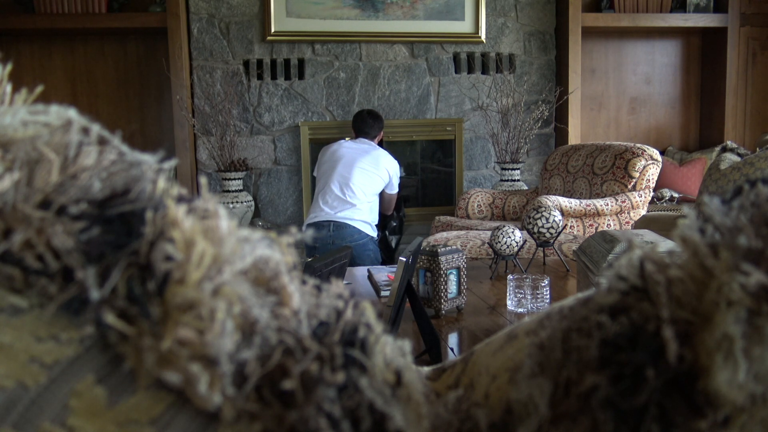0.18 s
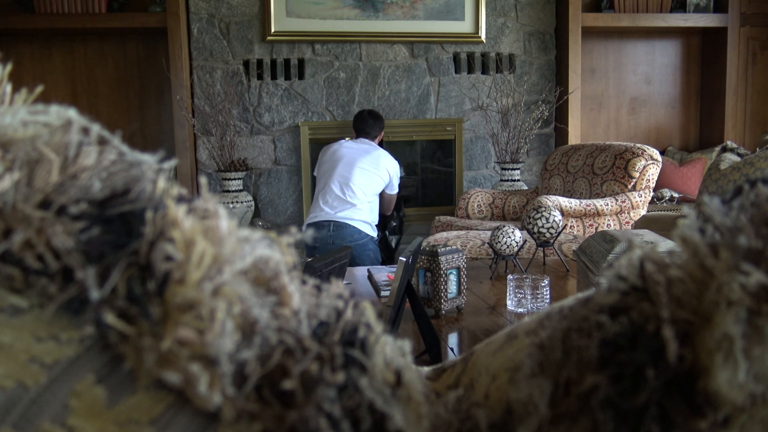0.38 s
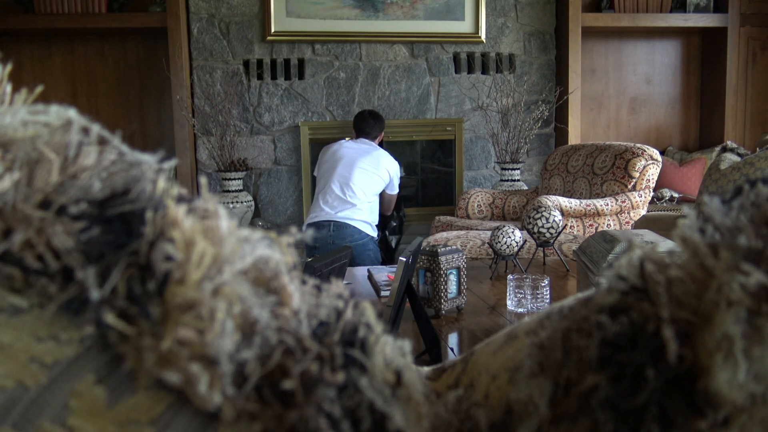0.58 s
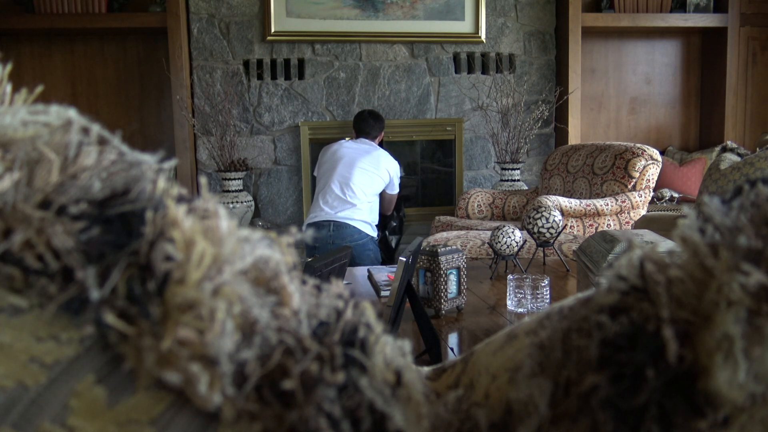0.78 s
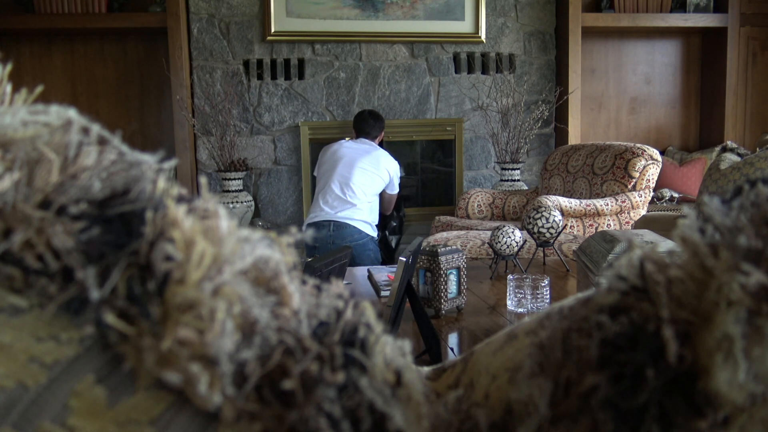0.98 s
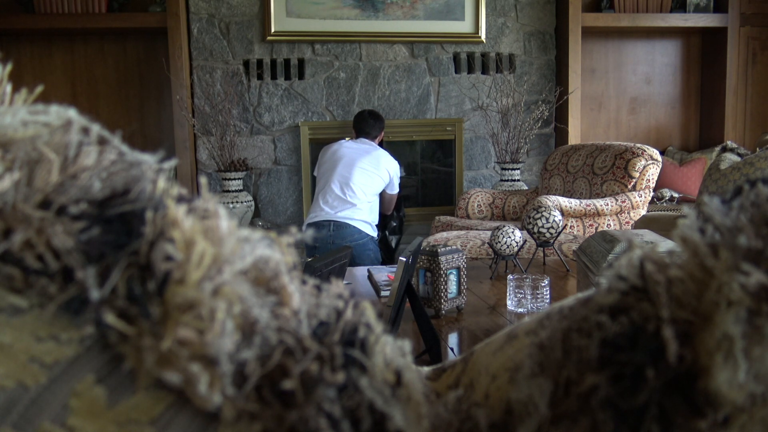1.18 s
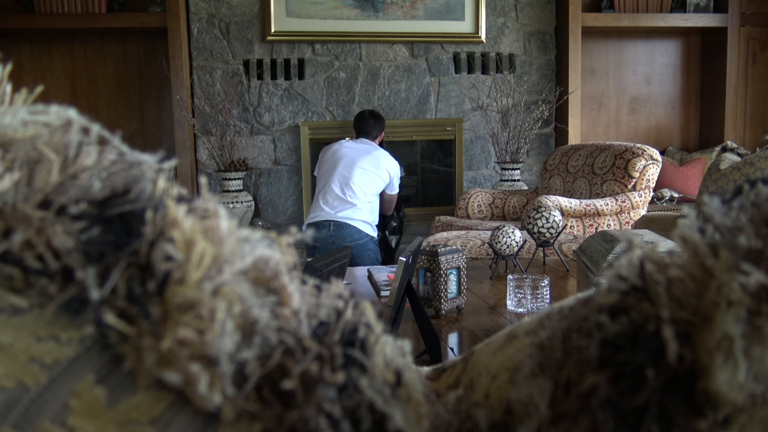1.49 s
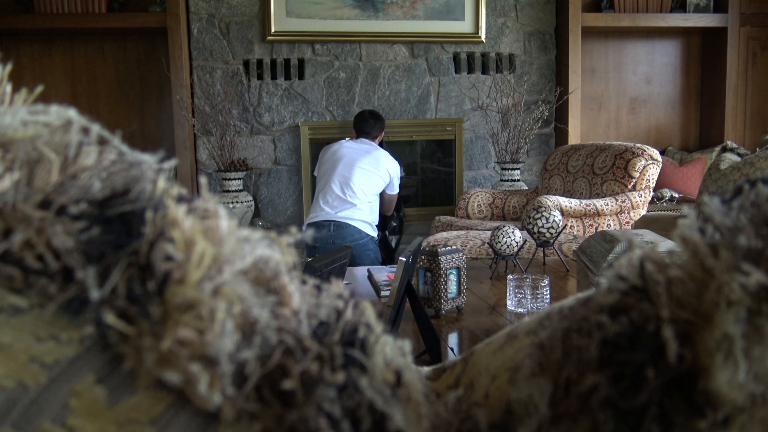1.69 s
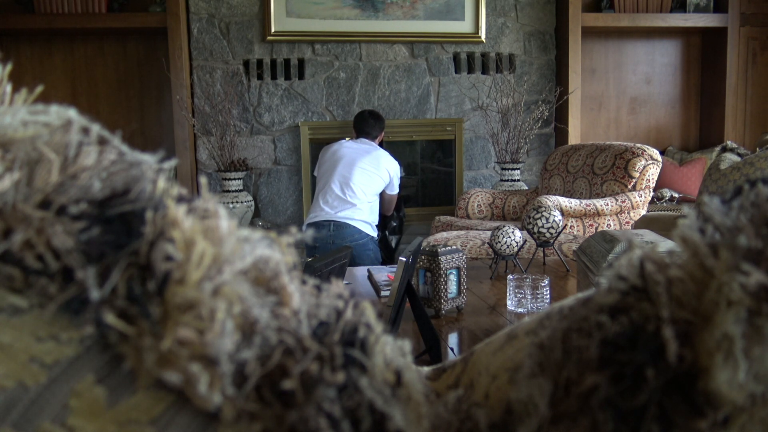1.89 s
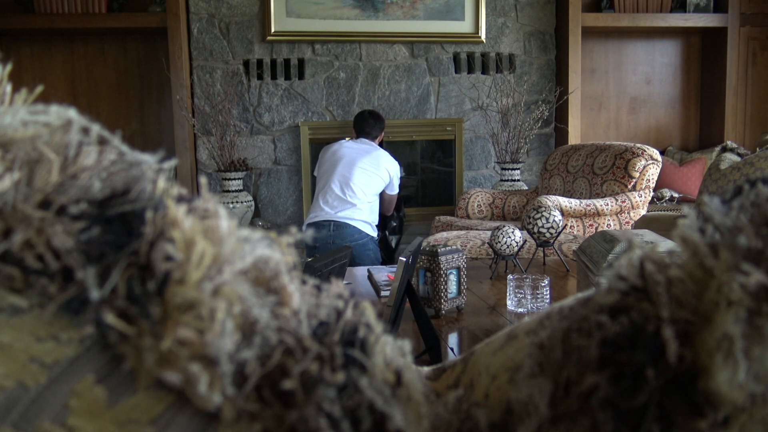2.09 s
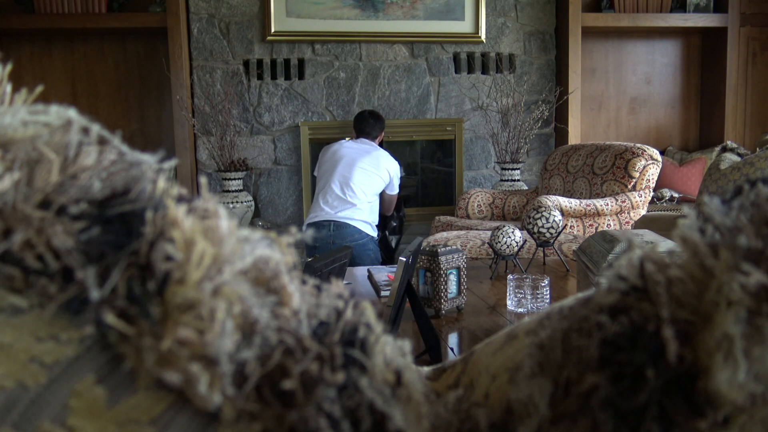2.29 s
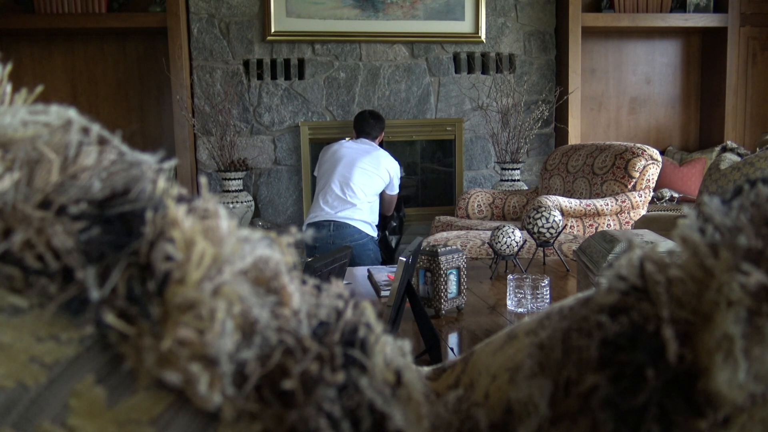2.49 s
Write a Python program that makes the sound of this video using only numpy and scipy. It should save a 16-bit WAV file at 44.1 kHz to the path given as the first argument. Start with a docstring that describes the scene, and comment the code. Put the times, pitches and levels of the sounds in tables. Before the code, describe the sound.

Six quick, even clanking shakes of steel and glass fireplace doors, loose panes chattering, then settling

```python
"""The metal-framed glass doors of a fireplace are shaken six times, heard from across a living room.
Each shake clashes the doors against the frame: noise cracks, echoes and decaying modes make the steel clack and ring.
Random ticks make loose panes chatter and low-pitched noise makes the firebox boom.
Damped sines and noise give dull knocks of the panels between the clashes and as the doors settle.
Noise tails let the room ring on over a faint hum of coloured noise."""
import sys
import numpy as np
from scipy import signal
from scipy.fft import rfft, irfft, next_fast_len
from scipy.io import wavfile

SR = 44100
rng = np.random.default_rng(int(sys.argv[2]) if len(sys.argv) > 2 else 0)


def dump_mix(stems):
    """Bounce the given channels to the path in sys.argv[1] as a 16-bit WAV at rate SR."""
    frames = np.atleast_2d(stems).T  # one column per channel
    limited = np.clip(frames, -1, 1)  # hard clip at full scale
    pcm = np.round(limited * 32767).astype(np.int16)
    wavfile.write(sys.argv[1], SR, pcm)


N = 114660
T = np.arange(round(.95 * SR)) / SR  # time axis of one event, s
TAIL_RISE_S = 0.0064  # time constant


def amp(db):
    """Decibel law: the amplitude gain of a level in dB."""
    return 10 ** (np.asarray(db) / 20)


def unit(x):
    """Normalisation: x scaled to rms 1."""
    return x / np.sqrt(np.mean(x ** 2) + 1e-20)


def along(points, hz):
    """Logarithmic interpolation: (frequency, value) points read on a log frequency axis."""
    f, v = np.transpose(points)
    return np.interp(np.log(hz + 1), np.log(f + 1), v)


def fade(t60_s):
    """Exponential decay: the level falls 60 dB in t60_s."""
    return np.exp(-np.log(1000) * T / t60_s)


def build_up(rise_s):
    """Exponential approach: a sound grows from zero with time constant rise_s."""
    return 1 - np.exp(-T / rise_s)


def noise():
    """White noise: equal power density at all frequencies, for the length of one event."""
    return rng.standard_normal(len(T))


def add(track, start_s, sound):
    """Superposition: mix a sound into the track at start_s."""
    i = round(start_s * SR)
    track[i:i + len(sound)] += sound[:N - i]


def coloured(x, gain):
    """Minimum-phase filtering: a causal filter of the given gain; white noise keeps its level."""
    m = 2 * next_fast_len(len(x) // 2 + 4096)
    magnitude = np.maximum(unit(gain(np.fft.rfftfreq(m, 1 / SR))), 1e-6)
    cepstrum = irfft(np.log(magnitude))
    # folding the cepstrum onto positive time makes the filter causal
    cepstrum[1:m // 2] *= 2
    cepstrum[m // 2 + 1:] = 0
    return irfft(rfft(x, m) * np.exp(rfft(cepstrum)))[:len(x)]


def shape(points, tilt_db=0):
    """Spectral envelope: the gain of a spectrum, tilted in dB per octave about 2500 Hz, down to 400 Hz."""
    def gain(hz):
        octaves = np.log2(np.maximum(hz, 400) / 2500)
        return amp(along(points, hz) + tilt_db * octaves)
    return gain


def resonances(table):
    """Resonance: the gain of several damped modes, their powers summed."""
    def gain(f):
        return np.sqrt(sum((amp(db) / (1 + ((f - hz) / width) ** 2)) ** 2 for hz, width, db in table))
    return gain


# reverberation of the living room: frequency [Hz], t60 [s]
ROOM_DECAY = [(60, 1.83), (150, 0.81), (280, 0.83), (550, 0.51), (900, 0.71), (1800, 0.7), (4800, .7),
              (9000, 0.62), (15000, 0.46)]


def tail():
    """Diffuse reverberation: noise that starts at rms 1, each frequency dying at its own rate."""
    hz, t, bands = signal.stft(noise(), SR, nperseg=256)
    decay = amp(-60 * t / along(ROOM_DECAY, hz)[:, None])
    return signal.istft(bands * decay, SR, nperseg=256)[1][:len(T)]


def in_room(x, wet_db):
    """Convolution: a sound plus its reverberation through a random room response of unit energy."""
    answer = tail() * build_up(TAIL_RISE_S)
    answer /= np.linalg.norm(answer)
    return x + amp(wet_db) * signal.fftconvolve(x, answer)[:len(x)]


def ticks(per_s, scatter_db):
    """Random impulse process: sparse contacts of either sign and uneven size, rms 1."""
    present = rng.random(len(T)) < per_s / SR
    sign = rng.choice([-1, 1], len(T))
    return unit(present * sign * amp(scatter_db * noise()))


# strong early echoes from ceiling and walls: delay [s], level [dB]
EARLY_ECHOES = [(.008, -1), (0.0138, -2.5), (0.027, -8)]


def contact(t60_s, tail_db, doors_tail):
    """Impact and reflection: a crack, its early echoes, then a room tail partly common to all contacts."""
    crack = amp(0.5) * fade(t60_s) * noise()
    delayed = sum(amp(db) * np.interp(T - delay_s, T, fade(t60_s), left=0) for delay_s, db in EARLY_ECHOES)
    echoes = delayed * noise()
    walls = amp(-1.5) * fade(0.12) * ticks(per_s=4300, scatter_db=-2)
    common = 0.42  # share of the tail's power
    room = np.sqrt(common) * doors_tail + np.sqrt(1 - common) * tail()
    return crack + echoes + (walls + amp(tail_db) * room) * build_up(TAIL_RISE_S)


# spectrum of the room's hum: frequency [Hz], density level [dB]
HUM_SPECTRUM = [(15, -21.5), (33, 0), (60, -2.5), (100, -2), (170, -8), (270, -5), (400, -11), (650, -17.5),
                (900, -10), (1150, -11.5), (1500, -22), (3000, -25), (15000, -29.5)]


def hum():
    """Stationary noise: the steady air of the room."""
    return amp(-57.5) * coloured(rng.standard_normal(N), shape(HUM_SPECTRUM))


# soft bumps as the doors settle: start_s [s], level_db [dB]
SOFT_BUMPS = [(1.595, -47.5), (1.745, -53.5), (1.768, -48.5), (1.787, -48.5), (1.865, -57.5)]
# spectrum of a bump: frequency [Hz], density level [dB]
BUMP_SPECTRUM = [(40, -14), (120, -6.5), (260, 2), (400, -6.5), (600, -12), (900, -25), (5000, -57)]
# the frame scraping in its track: start_s [s], length_s [s], level_db [dB] before reverberation
FRAME_SCRAPES = [(0.13, 0.11, -55.5), (1.553, 0.048, -53), (1.669, 0.065, -62)]


def settling():
    """Impact and friction: soft bumps and light scrapes as the doors are gripped and let go."""
    out = np.zeros(N)
    for start_s, level_db in SOFT_BUMPS:
        bump = coloured(noise() * fade(.3), shape(BUMP_SPECTRUM))
        add(out, start_s, amp(level_db) * bump)
    for start_s, length_s, level_db in FRAME_SCRAPES:
        stroke = np.sqrt(np.abs(np.sin(np.pi * np.minimum(T / length_s, 1))))
        scrape = in_room(stroke * ticks(per_s=3000, scatter_db=-0.5), wet_db=1.5)
        add(out, start_s, amp(level_db) * coloured(scrape, shape(CHATTER_SPECTRUM, tilt_db=-2)))
    return out


# spectrum of the firebox: frequency [Hz], density level [dB]
BOOM_SPECTRUM = [(18, -22), (36, 2), (48, -10), (64, -2.5), (95, -13.5), (125, -1), (160, -7.5),
                 (260, -5.5), (500, -32)]


def boom():
    """Air displacement: the doors push on the air of the firebox, heard as swelling low noise."""
    out = np.zeros(N)
    for start_s, *_, boom_db in DOOR_CLASHES:
        add(out, start_s, amp(boom_db) * tail() * build_up(0.027))
    return coloured(out, shape(BOOM_SPECTRUM))


# dull knocks of the panels; the note depends on where the glass is pressed:
# start_s [s], level_db [dB] of the note's parts before their own gains, pitch_hz [Hz], thud_db [dB]
PANEL_KNOCKS = [(.178, -47.5, 520, -55), (.204, -29.5, 606, -32.5), (.231, -24.5, 590, -31.5),
                (.294, -37.5, 594, -42), (.349, -31, 591, -38), (.376, -36, 590, -37.5),
                (0.4004, -23, 505, -26), (.432, -21.5, 572, -24.5), (.545, -26, 558, -29),
                (.634, -21.5, 517, -27), (.668, -23.5, 591, -26.5), (.831, -28.5, 504, -34.5),
                (.858, -20.5, 562, -30), (.874, -20, 559, -22), (.994, -32.5, 543, -27.5),
                (1.070, -28, 510, -33), (1.099, -23, 584, -23), (1.213, -30.5, 547, -39.5),
                (1.272, -28, 555, -33), (1.286, -22, 517, -26), (1.335, -29, 595, -41.5),
                (1.397, -38, 568, -48), (1.543, -49, 545, -49)]
# resonances of the doors under a blunt push: frequency [Hz], half-width at half gain [Hz], level [dB]
PANEL_MODES = [(193, 25, -9), (276, 32, -2.5), (346, 17, 0), (391.5, 23, -1.5), (730, 33, -2.5),
               (1010, 95, -11.5), (1464, 80, -9)]


def knocks():
    """Damped vibration: blunt contacts ring a glass panel and thud the door; the room carries both on."""
    notes, thuds = np.zeros(N), np.zeros(N)
    for start_s, level_db, pitch_hz, thud_db in PANEL_KNOCKS:
        room = tail() * build_up(TAIL_RISE_S)
        note = amp(4) * np.sin(2 * np.pi * pitch_hz * T) * fade(0.1)
        note_room = amp(-9) * coloured(room, resonances([(pitch_hz, 49, 0)]))
        add(notes, start_s, amp(level_db) * (note + note_room))
        thud = noise() * fade(0.1) + amp(-6.5) * room
        add(thuds, start_s, amp(thud_db) * thud)
    return notes + coloured(thuds, resonances(PANEL_MODES))


# spectrum of the buzzing panes, also used for the scrapes: frequency [Hz], density level [dB]
CHATTER_SPECTRUM = [(300, -3.5), (1500, 0.5), (3400, -3.5), (5000, 0.5), (6200, -2), (7500, -4),
                    (10800, -3.5), (12200, -11), (15800, -16)]


def chatter():
    """Repeated impact: loose panes buzz in their frames, swelling and fading after each clash."""
    out = np.zeros(N)
    for start_s, *_, peak_s, chatter_db, _ in DOOR_CLASHES:
        u = T / peak_s
        swell = u * np.exp(1 - u)  # reaches 1 at peak_s
        add(out, start_s, amp(chatter_db) * ticks(per_s=300, scatter_db=2) * swell)
    return coloured(in_room(amp(-5.5) * out, wet_db=3), shape(CHATTER_SPECTRUM))


# quickly damped resonances of the door edges: frequency [Hz], half-width at half gain [Hz], level [dB]
CLACK_MODES = [(2650, 92, -6), (3150, 110, -3), (3404, 100, -3), (4080, 75, -4.5), (4460, 200, -10.5)]
CLANG_MODES = [(1472, 57, -3.5), (2050, 64, 2), (2380, 130, -10), (2680, 80, -10)]


def edges():
    """Resonant filtering: each clash strikes the door edges, a bright clack and a lower clang."""
    clack, clang, doors_tail = np.zeros(N), np.zeros(N), tail()
    for start_s, _, _, clack_db, clang_db, *_ in DOOR_CLASHES:
        hit = contact(0.034, tail_db=-10.5, doors_tail=doors_tail)
        add(clack, start_s, amp(clack_db) * hit)
        add(clang, start_s, amp(clang_db) * hit)
    return coloured(clack, resonances(CLACK_MODES)) + coloured(clang, resonances(CLANG_MODES))


# modes of the steel frame: frequency [Hz], mean level [dB] within the ring, t60 [s]
FRAME_MODES = [(124, -11, .4), (261.8, -13, 0.93), (323.6, -8, 0.94), (353.4, -8, 0.666), (621, -14, 1),
               (714.6, -4.5, 0.37), (927, -9.5, 0.76), (1438, -6.5, 0.67), (1569, -11, 0.27),
               (2017, -11.5, 0.39), (2020, -3, 0.31), (2865, -12, 0.76), (3205, -21, 0.77),
               (3385, -14.5, 0.47)]


def ring():
    """Modal synthesis: the frame's modes as decaying sines, struck a little differently each time."""
    out = np.zeros(len(T))
    for hz, level_db, t60_s in FRAME_MODES:
        strength = amp(level_db + 2.5 * rng.standard_normal())
        out += strength * fade(t60_s) * np.sin(2 * np.pi * (hz * T + rng.random()))
    return out * build_up(TAIL_RISE_S)


# the doors meeting the frame: start_s [s], level_db [dB], treble tilt_db [dB per octave], clack_db [dB],
# clang_db [dB], chatter peak_s after the start [s], chatter_db [dB] before its swell and a 5.5 dB cut, boom_db [dB]
DOOR_CLASHES = [(0.2038, -23.5, -0.5, -25, -44, 0.038, -36, -36.5),
                (0.4131, -17, -1.2, -20, -31, 0.038, -27.5, -35.5),
                (0.6294, -20.5, 0, -25.5, -34, .01, -41, -42.5),
                (.6380, -19, 0, -37, -20.5, 0.011, -28.5, -35),
                (0.8482, -16.5, 0, -26.5, -24.5, 0.035, -27, -31),
                (1.0680, -18, -0.5, -19, -37.5, 0.034, -28, -36),
                (1.2786, -23, -0.5, -26, -48, 0.015, -32, -36.5)]
# spectrum of the crash: frequency [Hz], density level [dB]
CLASH_SPECTRUM = [(60, -22.5), (180, -6), (330, -1), (460, -2), (700, -1.5), (830, -5), (1100, 0),
                  (1500, 0), (2100, -1), (2750, -3.5), (3400, -1.5), (4100, -6.5), (5000, -7.5), (6200, -7),
                  (7300, -11), (10500, -14), (12500, -20), (15800, -26.5)]


def clashes():
    """Impact excitation: the doors hit the frame with a broad crash and the ring of the steel."""
    out, doors_tail = np.zeros(N), tail()
    for start_s, level_db, tilt_db, *_ in DOOR_CLASHES:
        hit = contact(0.017, tail_db=-3.5, doors_tail=doors_tail)
        crash = coloured(hit, shape(CLASH_SPECTRUM, tilt_db))
        add(out, start_s, amp(level_db) * (crash + amp(-7.5) * ring()))
    return out


def scene():
    """Mid-side stereo: the doors reach two close microphone ports alike; the room air differs a little."""
    mid = hum() + settling() + boom() + knocks() + chatter() + edges() + clashes()
    side = amp(-14.5) * hum()
    return np.array([mid + side, mid - side])


# level difference between the microphone ports: frequency [Hz], left minus right [dB]
PORT_DIFFERENCE = [(40, .6), (120, 1.6), (200, 2), (280, 1.4), (400, 0), (550, -1.5), (790, -2.7),
                   (1650, -2.5), (2400, -1.4), (3400, -.7), (6400, -.5), (9500, 0)]


def record(dry):
    """Linear filtering: the ports differ slightly in level; nothing is kept above the band limit."""
    m = next_fast_len(N + SR // 2)
    hz = np.fft.rfftfreq(m, 1 / SR)
    ports = amp(np.array([[.5], [-.5]]) * along(PORT_DIFFERENCE, hz))
    in_band = hz < 15800
    return irfft(rfft(dry, m) * ports * in_band, m)[:, :N]


dry = scene()
out = record(dry)
dump_mix(out)
```